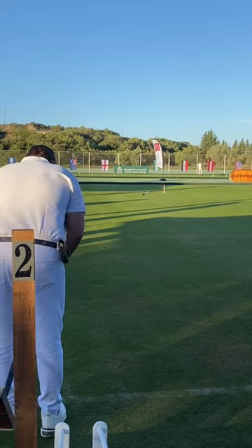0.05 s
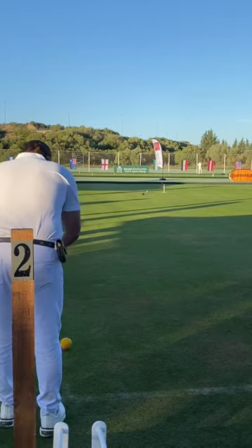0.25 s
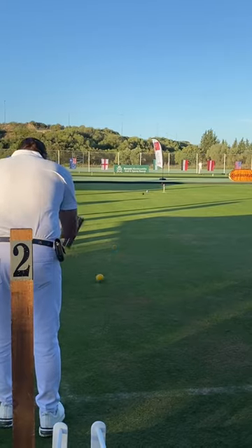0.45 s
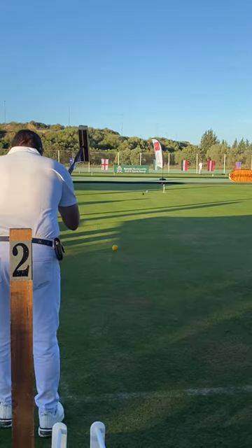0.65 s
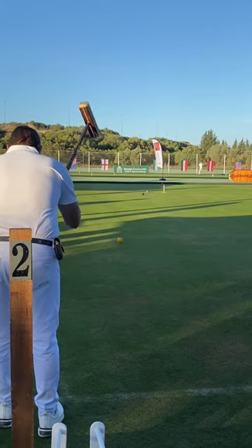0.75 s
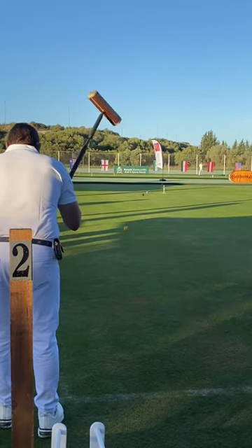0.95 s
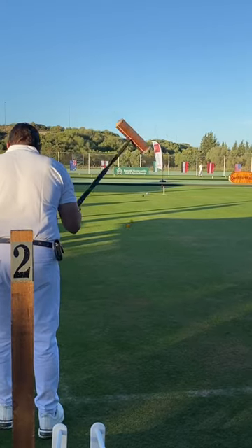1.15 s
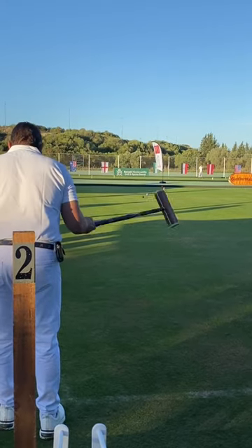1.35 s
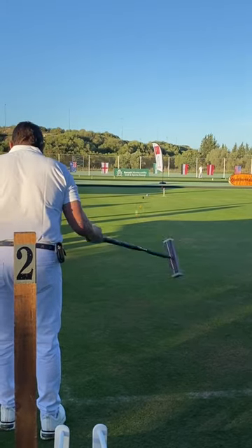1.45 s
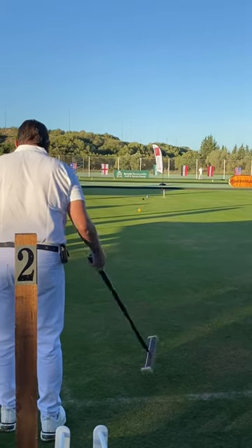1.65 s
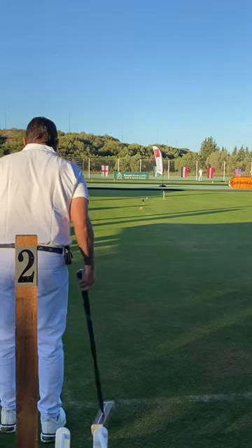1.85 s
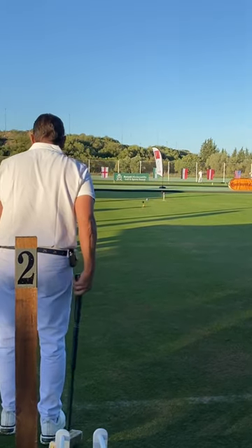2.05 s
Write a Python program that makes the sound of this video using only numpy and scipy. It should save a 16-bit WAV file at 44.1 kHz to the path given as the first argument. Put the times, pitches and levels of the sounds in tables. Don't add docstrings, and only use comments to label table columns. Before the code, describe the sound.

One sharp, dry mallet-on-ball crack outdoors, ball skipping over grass, later soft scuffs and knocks

```python
import sys
import numpy as np
from scipy import signal
from scipy.fft import rfft, irfft, next_fast_len
from scipy.io import wavfile
from scipy.ndimage import uniform_filter1d

SR = 44100
rng = np.random.default_rng(int(sys.argv[2]) if len(sys.argv) > 2 else 0)


def boost(x):
    u = np.asarray(x, float) / 20
    return 10 ** u


def wrap_up_sound(samples):
    columns = np.atleast_2d(samples).T
    tamed = np.clip(columns, -1, 1)
    steps = np.round(tamed * 32767).astype(np.int16)
    wavfile.write(sys.argv[1], SR, steps)


N = 92610
SIZE = next_fast_len(N + SR // 2)
STRIKE_S = .2248


def at_hz(points, hz):
    table = np.array(points)
    return np.interp(np.log(hz), np.log(table[:, 0]), table[:, 1])


def rms_one(x):
    return x / np.sqrt(np.mean(x ** 2) + 1e-20)


def grid():
    return np.maximum(np.arange(SIZE // 2 + 1) * SR / SIZE, 1.0)


def butter(x, order, hz, kind):
    return signal.sosfilt(signal.butter(order, hz, kind, fs=SR, output="sos"), x)


def drift(rate_hz):
    r = np.exp(-80 * np.pi * rate_hz / SR)
    slow = signal.lfilter([1], [1, -2 * r, r * r], rng.standard_normal(N // 40 + 2002))
    slow = slow[2000:]
    return np.interp(np.arange(N) / 40, np.arange(len(slow)), rms_one(slow))


def ring(clicks, hz, t60_s):
    r = boost(-60 / (t60_s * SR))
    w = 2 * np.pi * hz / SR
    return signal.lfilter([0, np.sin(w)], [1, -2 * r * np.cos(w), r * r], clicks + 1e-18)


def click(s, db):
    out = np.zeros(N)
    out[int(s * SR)] = boost(db)
    return out


def swell(s, rise_s, fall_s):
    t = np.arange(N) / SR - s
    return np.where(t < 0, np.exp(-(t / rise_s) ** 2), np.exp(-np.maximum(t, 0) / fall_s))


# frequency in Hz, likeness 0-1.
PORT_LIKENESS = [(150, 1), (250, .99), (400, .9), (700, .75), (1300, .5), (2400, .85), (3200, .95),
                 (15000, .97)]
BLADES_PER_S = 1200


def noise(spectrum, patchy_db, grain=0):
    hz = grid()
    white = rng.standard_normal((2, N))
    hits = rng.random(N) < BLADES_PER_S / SR
    grains = hits * boost(3.0 * rng.exponential(1, N)) * rng.choice([-1, 1], N)
    white[0] = np.sqrt(1 - grain) * white[0] + np.sqrt(grain) * rms_one(grains)
    low_hz, high_hz = spectrum[0][0], spectrum[-1][0]
    skirts = np.minimum(1, hz / low_hz) ** 2 * np.minimum(1, high_hz / hz) ** 3
    colour = boost(at_hz(spectrum, hz)) * skirts
    alike = np.clip(at_hz(PORT_LIKENESS, hz), 0, 1)
    mid, side = rfft(white, SIZE) * colour * np.sqrt([1 + alike, 1 - alike])
    out = 0
    for centre_hz in 25 * 2 ** np.arange(0, 10.0):
        octaves_off = np.abs(np.log2(np.clip(hz, 25, 12800) / centre_hz))
        share = np.clip(1 - octaves_off, 0, 1)
        band = irfft([(mid + side) * share, (mid - side) * share], SIZE)[:, :N]
        out = out + boost(patchy_db * drift(18.0)) * band
    return rms_one(out)


# frequency in Hz, level in dB per Hz.
DRONE_SPECTRUM = [(15, -53), (25, -23.5), (37, -9), (102, -0.5), (144, -5.5), (267, -20), (315, -19.5),
                  (458, -15.5), (900, -39.5), (1170, -69), (1980, -120)]
# frequency in Hz, level in dB per Hz.
AIR_SPECTRUM = [(600, -8), (900, 1), (1500, -7.5), (2400, -22.5), (4500, -37), (7500, -42), (11000, -41.5),
                (15000, -52)]
# time in seconds, level in dB.
TRAFFIC_SWELL = [(0.5, -32), (0.74, -52), (0.868, -31), (0.891, -47.5), (0.953, -34), (1.11, -45),
                 (1.128, -41.5), (1.306, -48), (2.083, -37), (2.1, -36)]
DRONE_DB, AIR_DB, TRAFFIC_FOLLOWS = -38, -61.5, 0.3
HUM_HZ, HUM_WIDTH_HZ, HUM_DB = 102, 18, -49.5


def surroundings():
    hum = rms_one(ring(rng.standard_normal(N), HUM_HZ, 2.9 / HUM_WIDTH_HZ))
    s, db = np.transpose(TRAFFIC_SWELL)
    swell_db = np.interp(np.arange(N) / SR, s, db - db.mean(), left=0)
    drone = boost(DRONE_DB) * noise(DRONE_SPECTRUM, patchy_db=1.2)
    traffic = boost(TRAFFIC_FOLLOWS * swell_db) * (drone + boost(HUM_DB) * hum)
    return traffic + boost(AIR_DB) * noise(AIR_SPECTRUM, patchy_db=.7)


# time in seconds, level in dB.
TYRE_SWELL = [(0.45, -45), (0.468, -51), (0.756, -53.5), (0.816, -46.5), (1.562, -53.5), (1.676, -48),
              (2.1, -48)]
TYRE_BAND_HZ, TYRE_TRIM_DB, TYRE_SIDE = (426, 630), -4, 0.41


def tyres():
    s, db = np.transpose(TYRE_SWELL)
    mid, side = butter(rng.standard_normal((2, N)), 2, TYRE_BAND_HZ, "band")
    gain = boost(TYRE_TRIM_DB + np.interp(np.arange(N) / SR, s, db) + 1.2 * drift(4.6))
    return gain * rms_one(mid + TYRE_SIDE * side * [[1], [-1]])


# start in seconds, level in dB, start pitch in Hz, end pitch in Hz, length in seconds.
BIRD_NOTES = [(.01, -77, 5300, 5900, 0.019), (0.055, -91, 4300, 4600, .03), (0.156, -87, 3600, 3600, 0.02),
              (0.467, -68, 4500, 4620, .018), (0.523, -65, 4520, 4690, 0.013),
              (1.023, -78.5, 4310, 4890, 0.025), (1.043, -69.5, 4090, 4740, 0.034),
              (1.072, -73.5, 4380, 4700, 0.024), (1.098, -80, 4610, 4720, 0.03),
              (1.247, -87, 2984, 2905, .03), (1.282, -87, 4130, 4180, .02), (1.294, -89, 3440, 3330, .03),
              (1.312, -91, 4600, 4480, .035), (1.539, -84.5, 4600, 4800, .025),
              (1.545, -89, 3365, 3230, .02), (1.565, -81.5, 4460, 4696, 0.014),
              (1.568, -86, 3000, 3140, .02), (1.676, -84, 3850, 4550, 0.026),
              (1.694, -68.5, 4540, 4690, 0.03), (1.725, -74.5, 4600, 4640, .024),
              (1.843, -68.5, 4460, 4900, .02)]
BIRD_WET_DB, BIRD_T60_S, BIRD_GLIDE, BIRD_ROUGH, ROUGH_HZ = -5, .4, .35, .75, 550


def bird():
    song = np.zeros(N)
    for s, db, start_hz, end_hz, length_s in BIRD_NOTES:
        u = np.arange(int(length_s * SR)) / (length_s * SR)
        hz = end_hz + (start_hz - end_hz) * np.exp(-u / BIRD_GLIDE)
        tone = np.sin(2 * np.pi * np.cumsum(hz) / SR)
        start = int(s * SR)
        song[start:start + len(u)] += boost(db + 4.5) * np.sin(np.pi * u) * tone
    rasp = rms_one(butter(rng.standard_normal(N), 2, ROUGH_HZ, "low"))
    song = song * (1 + BIRD_ROUGH * rasp)
    decay = boost(-60 * np.arange(SR // 2) / SR / BIRD_T60_S)
    trees = rng.standard_normal((2, SR // 2)) * decay
    trees = trees + 3.0 * trees[0]
    trees = trees / np.sqrt(np.sum(trees[0] ** 2))
    return song + boost(BIRD_WET_DB) * signal.fftconvolve(song[None], trees, axes=1)[:, :N]


# time in seconds, level in dB, pitch in Hz, t60 in seconds.
GROUND_KNOCKS = [(0.209, -53, 2470, 0.14), (.2165, -49, 1700, .012), (0.218, -36, 4440, 0.0031),
                 (.4385, -56, 4000, .002), (0.458, -43, 5040, 0.0075), (.496, -53, 4840, .006),
                 (.5055, -43.5, 5200, .002), (0.5065, -48, 3600, 0.0023), (.5135, -64, 1190, 0.0079),
                 (0.5149, -33.5, 3560, 0.0025), (.518, -42, 4220, 0.0035), (0.533, -53, 3100, 0.008),
                 (0.536, -49, 3150, 0.01), (0.5065, -37, 5870, .003), (.521, -41, 3100, 0.005),
                 (.609, -50, 609.5, 0.012), (1.555, -60.5, 11450, .012), (1.559, -62, 10800, 0.012),
                 (1.691, -55, 2360, 0.025), (1.715, -56, 2330, 0.046), (1.748, -55.5, 2500, .02),
                 (1.7494, -60, 3120, 0.015), (1.832, -53, 2600, 0.0087), (1.848, -46.5, 2700, .008),
                 (1.86, -43, 1410, 0.008), (1.875, -54, 2800, .015), (1.874, -43, 3300, 0.012),
                 (1.894, -46, 2340, 0.018), (1.911, -40, 2580, 0.0072), (1.92, -49.5, 1026, 0.19),
                 (1.928, -52, 2350, 0.027), (1.946, -63, 4600, 0.022), (1.854, -49, 5130, .008),
                 (1.865, -47, 4900, 0.0084), (1.89, -47, 5040, 0.013), (1.876, -53, 1500, 0.0068),
                 (1.899, -45, 1310, 0.0089), (2.035, -62, 6050, 0.011), (1.958, -56, 2650, 0.036),
                 (1.97, -32, 103, 0.037), (2.004, -62, 2620, 0.13)]
KNOCK_ROUGH = .45


def knocks():
    rings = sum(ring(click(s, db), hz, t60_s) for s, db, hz, t60_s in GROUND_KNOCKS)
    choke = rms_one(uniform_filter1d(rng.standard_normal(N), size=40))
    return signal.lfilter([.4], [1, -.6], rings * (1 + KNOCK_ROUGH * choke))


# pitch in Hz, level in dB, t60 in seconds, late start in seconds,
# left over right in dB.
WOOD_MODES = [(165, -21, .0093, .0024, 0), (272, -10, .0076, .00295, -1.5), (878, -2.6, .0053, .0018, 2),
              (1240, -8.5, .0047, .00104, 2.5), (1715, -2.5, .0031, .0008, 1.8),
              (3720, -22, .0042, .0004, .8), (4880, -29, .004, .0008, .5), (5700, -20.5, .003, 0, 2),
              (6350, -24, .0026, .00009, 1.8), (8550, -24.5, .003, .0005, 2.3),
              (10150, -25, .0022, .0005, 2.5), (11580, -28, .0022, .0005, 2.8),
              (12570, -27.5, .002, .0005, 2.8), (14500, -27, .0013, .0005, 2.8)]
# delay in seconds, level in dB, centre in Hz.
BLOW_ECHOES = [
    (.0095, -20, 7900),
    (0.0205, -33, 5214),
    (.032, -36, 8995),
    (.045, -34, 1021),
    (.119, -39.5, 1300),
]
# frequency in Hz, level in dB per Hz.
SCATTER_SPECTRUM = [(350, -61), (600, -27), (708, -8), (944, -4), (2310, -12), (2950, -22), (6920, -22.5),
                    (12300, -32.5), (16000, -45.5)]
STRIKE_DB, BLOW_FROM_HZ = -3, 92
CRACK_DB, CRACK_S, CRACK_FROM_HZ = -42, .0007, 4000
SCATTER_DB, SCATTER_RISE_S, SCATTER_T60_S = -46, 0.0017, 0.59


def strike():
    blow = 0
    for hz, db, t60_s, late_s, pan_db in WOOD_MODES:
        once = ring(click(STRIKE_S + late_s, 0), hz, t60_s)
        mode = ring(once, hz, t60_s)
        gain = boost(STRIKE_DB + db + pan_db * np.array([[.5], [-.5]]))
        blow = blow + gain * mode / np.abs(mode).max()
    t = np.maximum(np.arange(N) / SR - STRIKE_S, 0)
    crack = boost(CRACK_DB) * rng.standard_normal(N) * t / CRACK_S * np.exp(1 - t / CRACK_S)
    blow = blow + butter(crack, 2, CRACK_FROM_HZ, "high")
    blow = butter(blow, 2, BLOW_FROM_HZ, "high")
    for lag_s, db, centre_hz in BLOW_ECHOES:
        band = signal.butter(1, [centre_hz / 1.6, centre_hz * 1.6], "band", fs=SR)
        blow = blow + boost(db) * np.roll(signal.lfilter(*band, blow), int(lag_s * SR), axis=1)
    scatter = (1 - np.exp(-t / SCATTER_RISE_S)) * boost(SCATTER_DB - 60 * t / SCATTER_T60_S)
    return blow + scatter * noise(SCATTER_SPECTRUM, patchy_db=2.0)


# time in seconds, hiss level in dB, length in seconds, thump level in dB.
BALL_SKIPS = [
    (0.384, -59.5, 0.014, -77),
    (0.443, -58.5, 0.0048, -81),
    (0.457, -55, 0.0077, -75),
    (0.496, -59, 0.0045, -82),
    (0.511, -52.5, 0.0087, -59),
    (0.523, -67.5, .008, -84),
    (.6, -64, 0.011, -76.5),
    (0.764, -72, 0.015, -75.5),
    (0.885, -85.5, 0.018, -79),
]
# frequency in Hz, level in dB per Hz.
GRASS_SPECTRUM = [(900, -41), (1500, -6.5), (3000, -6.5), (4400, -2), (7200, -9), (11400, -11),
                  (13300, -15), (15600, -14)]
ROLL_DB, ROLL_FROM_S, ROLL_T60_S = -65.5, 0.398, 0.93


def ball():
    t = np.arange(N) / SR
    level = sum(boost(db) * np.exp(-(np.abs(t - s) / length_s) ** 3) for s, db, length_s, _ in BALL_SKIPS)
    level = level + boost(ROLL_DB) * swell(ROLL_FROM_S, 0.021, ROLL_T60_S / np.log(1000))
    thumps = sum(click(s, thump_db + 16.5) for s, _, _, thump_db in BALL_SKIPS)
    return level * noise(GRASS_SPECTRUM, patchy_db=1.2, grain=.25) + ring(thumps, 1100, .02)


# time in seconds, level in dB, rise in seconds, fall in seconds,
# hiss level in dB.
TURF_BRUSHES = [
    (1.57, -83, 0.035, 0.056, -88),
    (1.732, -63.5, 0.036, 0.036, -78.5),
    (1.852, -56, 0.014, 0.039, -75),
    (1.879, -58, 0.025, 0.027, -63.5),
    (1.93, -65, 0.074, 0.08, -106),
    (2.0, -69, 0.058, 0.047, -79.5),
]
# frequency in Hz, level in dB per Hz.
TURF_SPECTRUM = [(800, -24), (1100, 7.5), (1800, -4), (2500, 4.5), (3600, -8), (5000, -18.5),
                 (10000, -30.5), (14000, -29.5)]
# pitch in Hz, level in dB, t60 in seconds.
HEAD_MODES = [(1180, 6, 0.0067), (2460, -2, 0.039), (2580, -12, 0.011), (3300, -1.5, 0.018),
              (4600, -9, 0.027), (5340, -13, 0.0092)]
BLADE_SHARE, HISS_FROM_HZ, SNAPS_PER_S, SNAP_DB = .6, 7500, 340, -5.5


def mallet_brush():
    level = hiss_level = 0
    for s, db, rise_s, fall_s, hiss_db in TURF_BRUSHES:
        shape = swell(s, rise_s, fall_s)
        level = level + boost(db) * shape
        hiss_level = hiss_level + boost(hiss_db) * shape
    turf = noise(TURF_SPECTRUM, patchy_db=1.5, grain=BLADE_SHARE)
    low = butter(turf, 4, HISS_FROM_HZ, "low")
    hiss = butter(turf, 4, HISS_FROM_HZ, "high")
    snaps = 0
    for hz, db, t60_s in HEAD_MODES:
        hits = rng.random(N) < SNAPS_PER_S / len(HEAD_MODES) / SR
        snaps = snaps + ring(hits * boost(db + rng.normal(0, 4, N)), hz, t60_s)
    return level * (low + boost(SNAP_DB) * rms_one(snaps)) + hiss_level * rms_one(hiss)


DUCK_DB, DUCK_HOLD_S, DUCK_RELEASE_S = -9, .07, .14


def scene():
    t = np.arange(N) / SR - STRIKE_S
    release = np.exp(-(np.maximum(t - DUCK_HOLD_S, 0) / DUCK_RELEASE_S) ** 1.5)
    duck = boost(DUCK_DB * (t > 0) * release)
    return duck * (surroundings() + tyres()) + bird() + knocks() + strike() + ball() + mallet_brush()


def low_pass(x):
    return signal.sosfilt(signal.butter(12, 16710, fs=SR, output="sos"), x)


# frequency in Hz, left lead in radians.
PORT_PHASE = [(200, 0), (1600, .3), (3000, .05), (5000, .3), (7000, 2.9), (7900, 3.4), (10400, 6.28),
              (13300, 9.2), (14200, 9.7), (16500, 12.4)]
CUTOFF_HZ, RUMBLE_CUT_HZ = 16300, 43


def record(dry):
    hz, lead_rad = np.transpose(PORT_PHASE)
    turn = np.exp(-1j * np.interp(grid(), hz, lead_rad) * np.array([[0], [1]]))
    ports = irfft(rfft(dry, SIZE) * turn, SIZE)[:, :N]
    cut = signal.sosfilt(signal.cheby2(12, 70, CUTOFF_HZ, fs=SR, output="sos"), ports)
    return low_pass(butter(cut, 2, RUMBLE_CUT_HZ, "high"))


dry = scene()
out = record(dry)
wrap_up_sound(out)
```